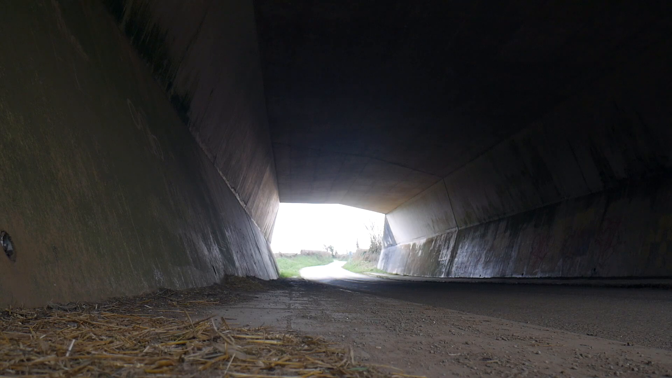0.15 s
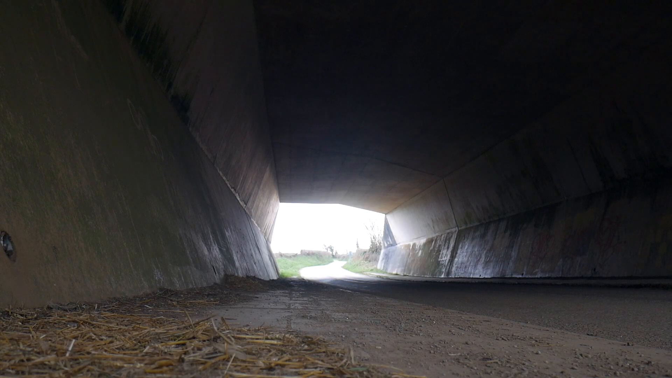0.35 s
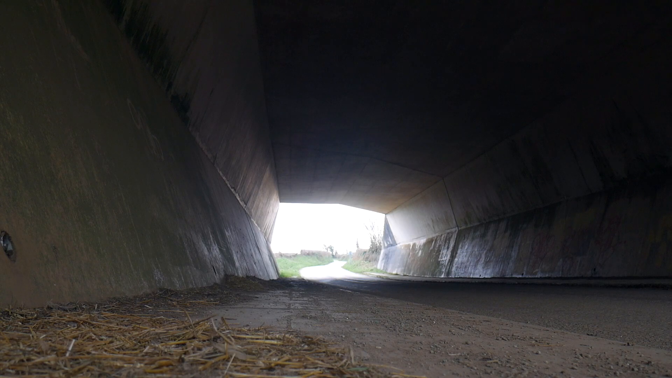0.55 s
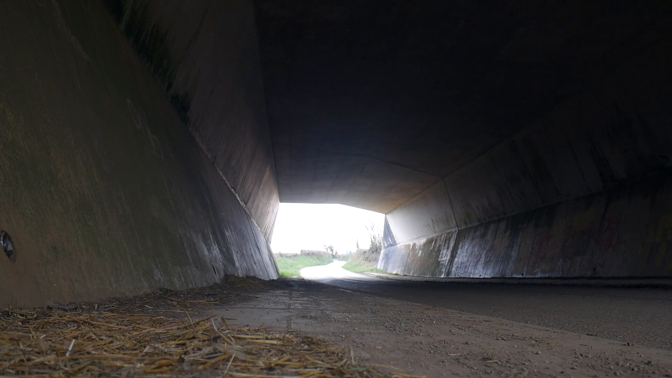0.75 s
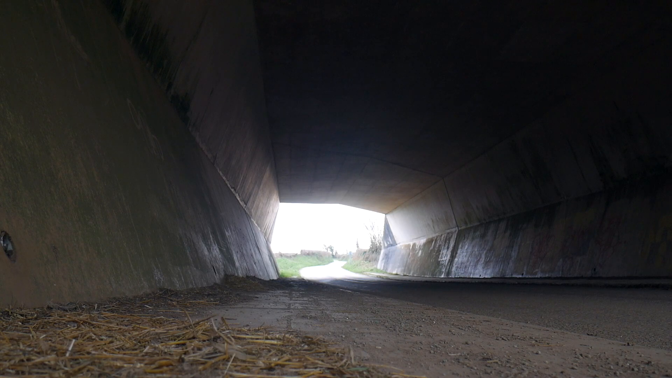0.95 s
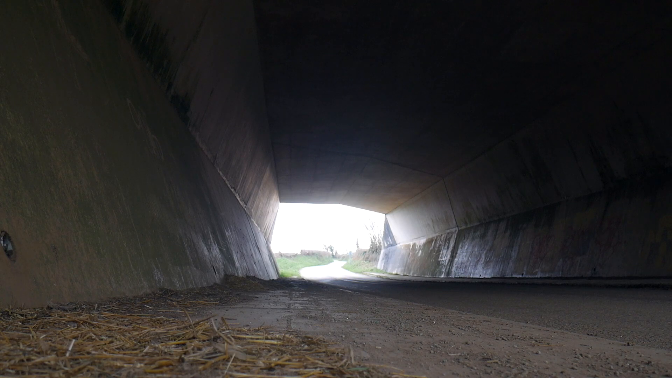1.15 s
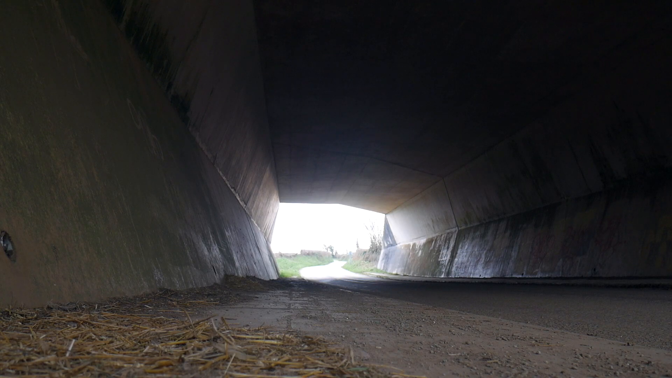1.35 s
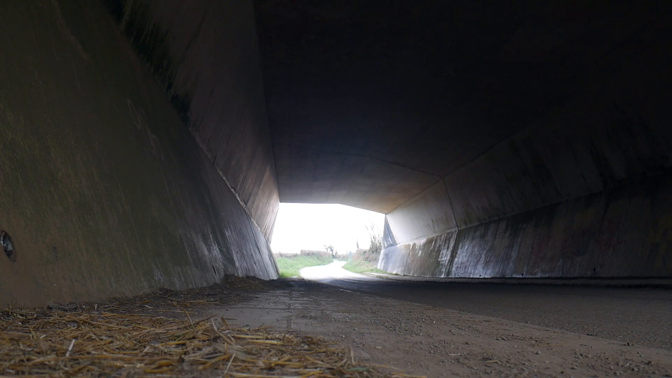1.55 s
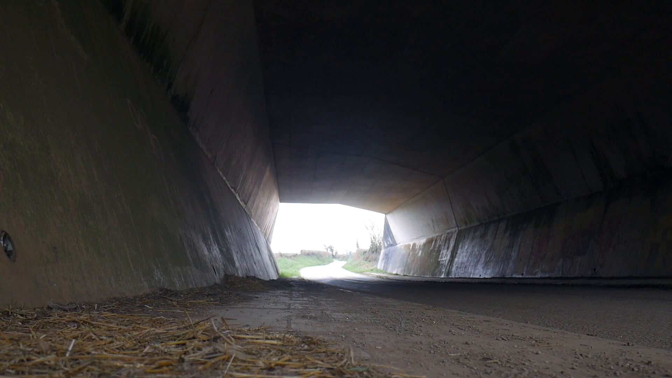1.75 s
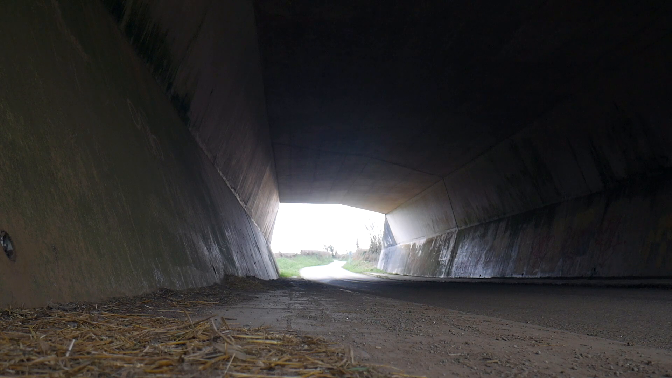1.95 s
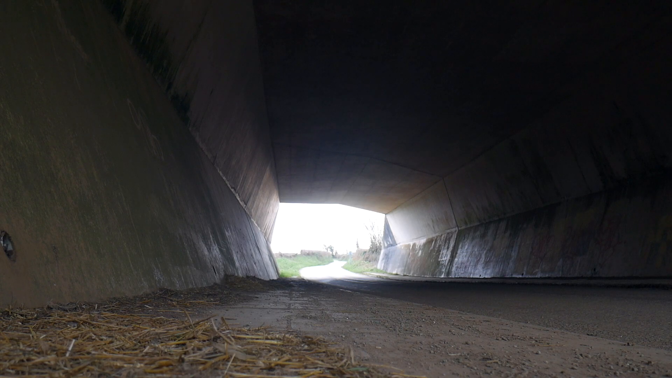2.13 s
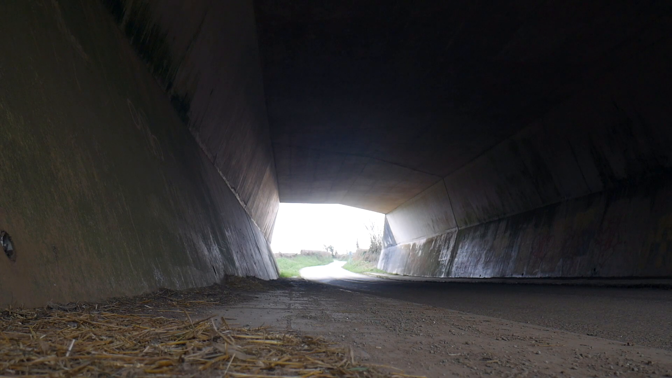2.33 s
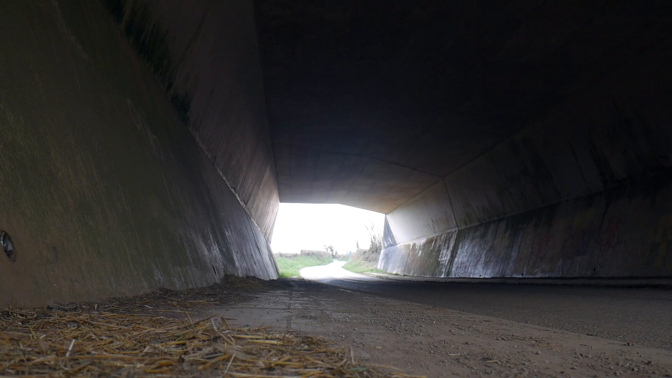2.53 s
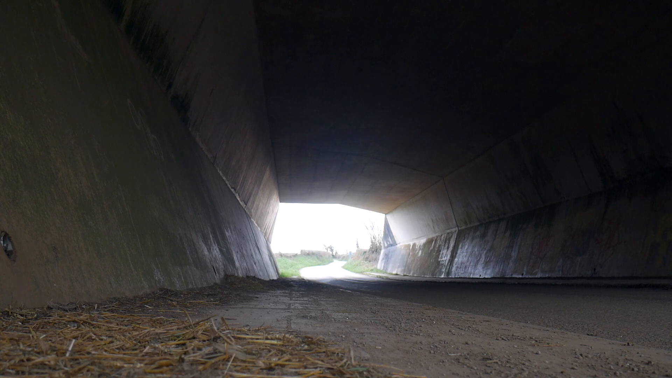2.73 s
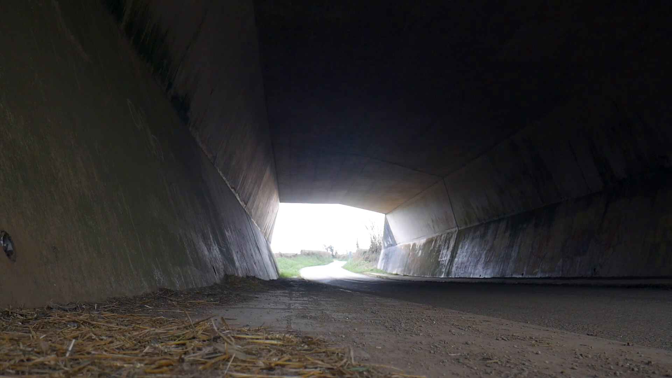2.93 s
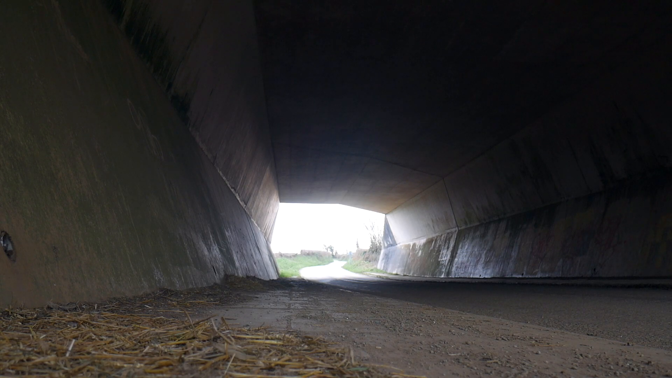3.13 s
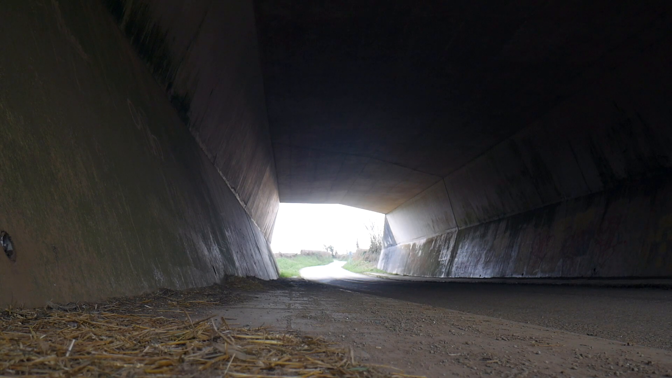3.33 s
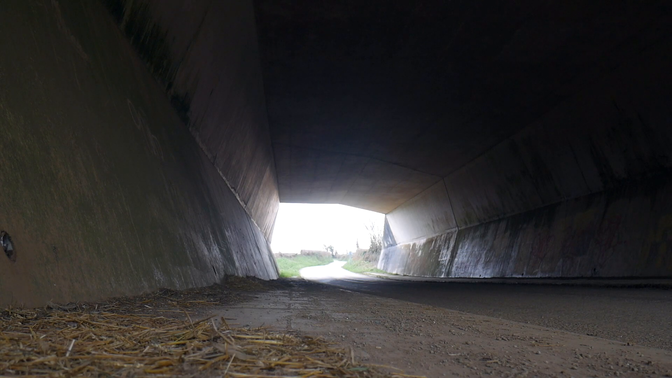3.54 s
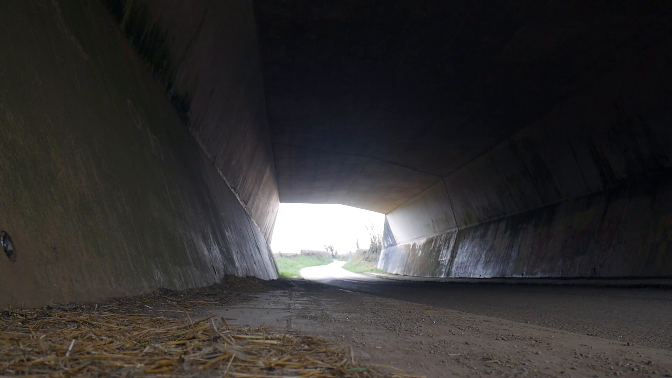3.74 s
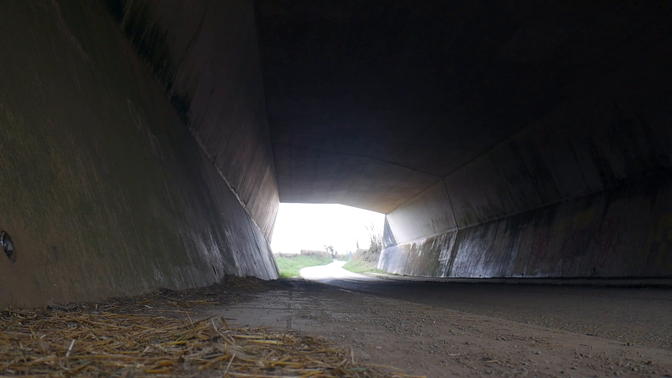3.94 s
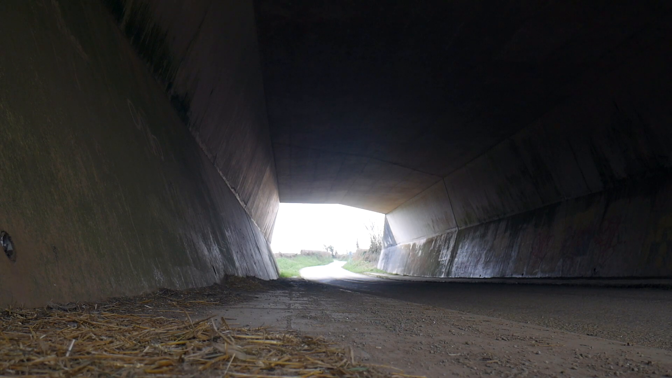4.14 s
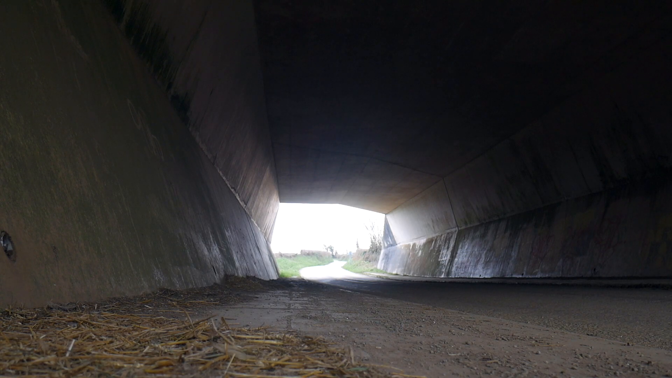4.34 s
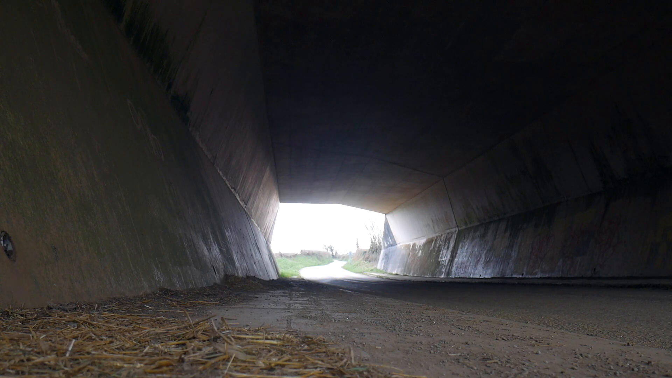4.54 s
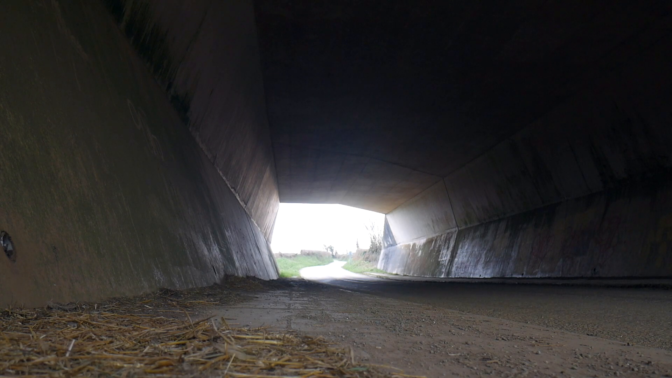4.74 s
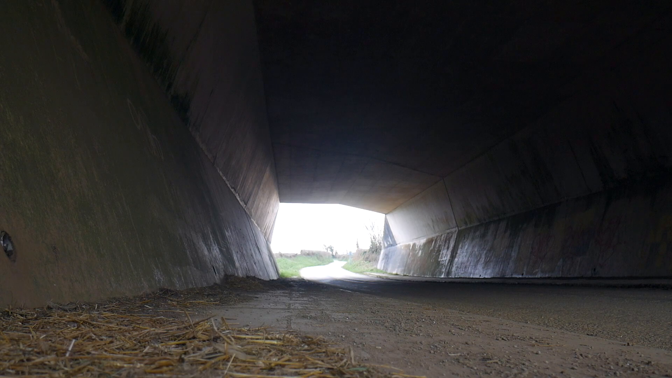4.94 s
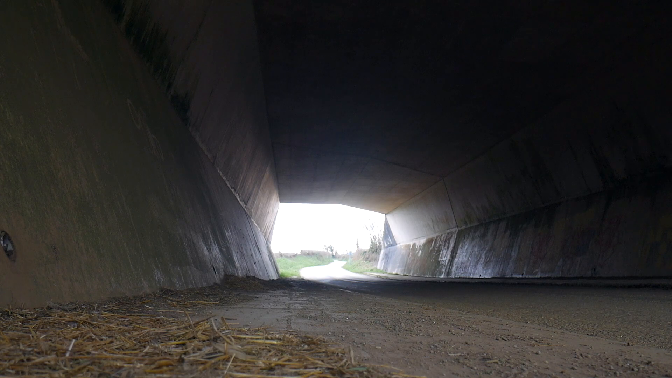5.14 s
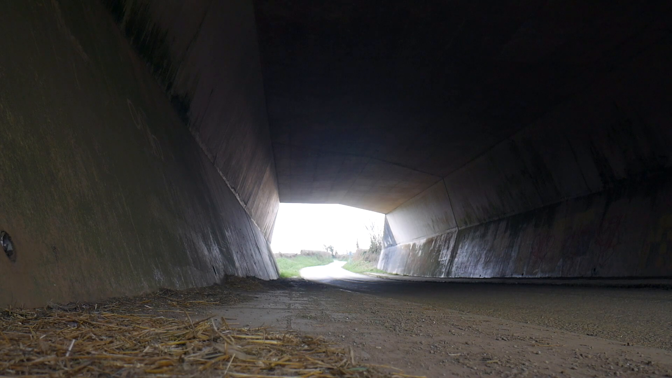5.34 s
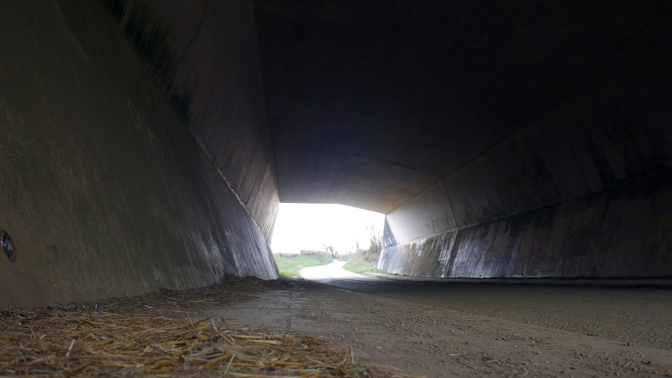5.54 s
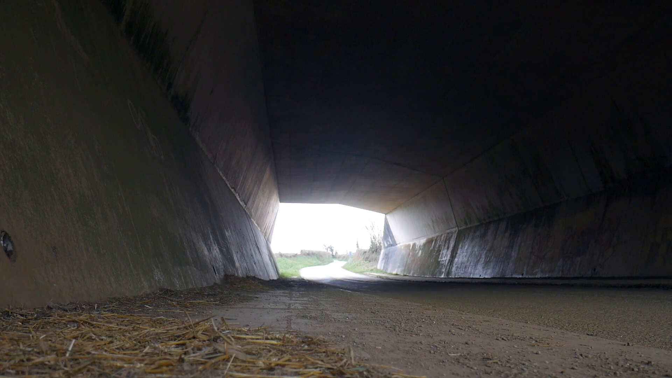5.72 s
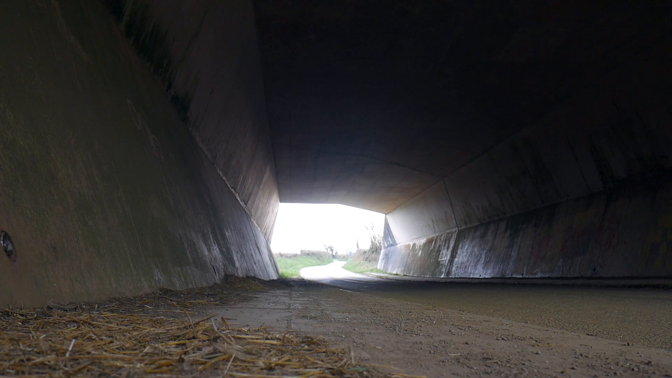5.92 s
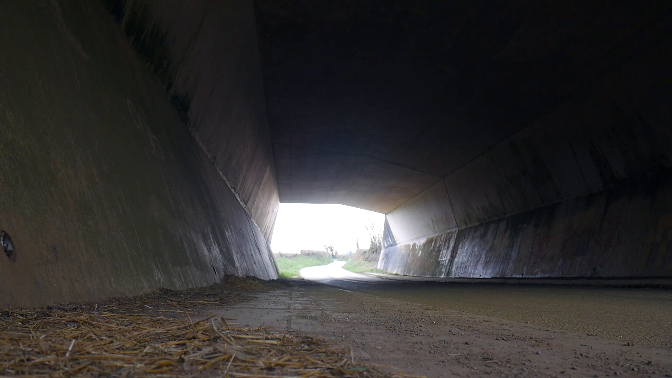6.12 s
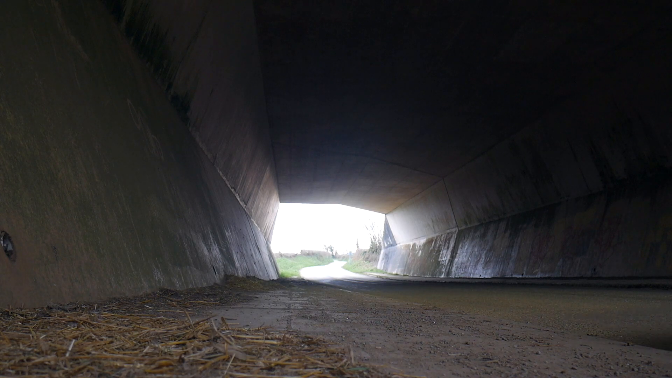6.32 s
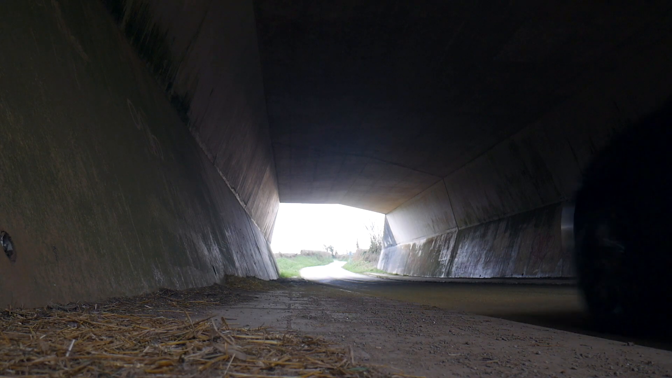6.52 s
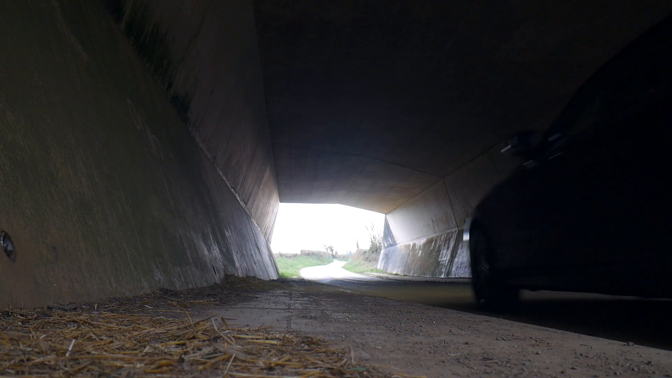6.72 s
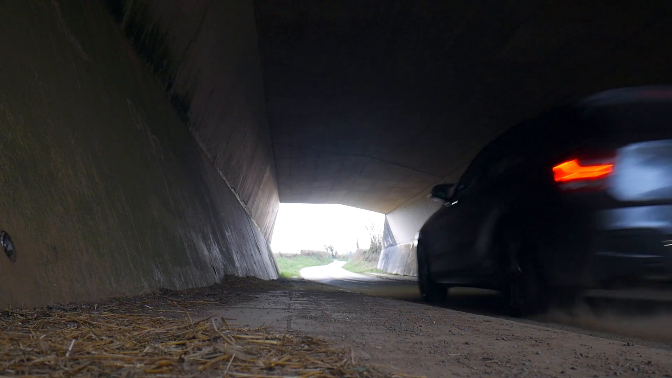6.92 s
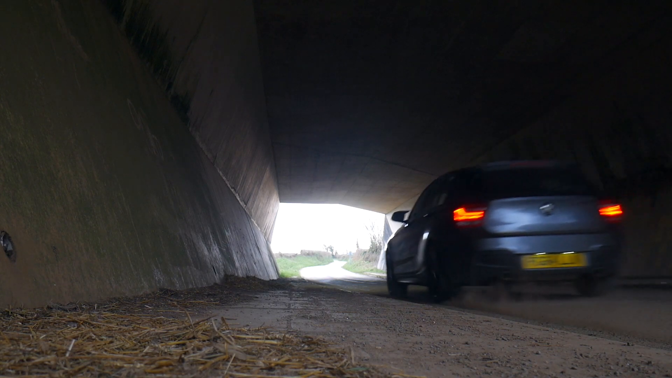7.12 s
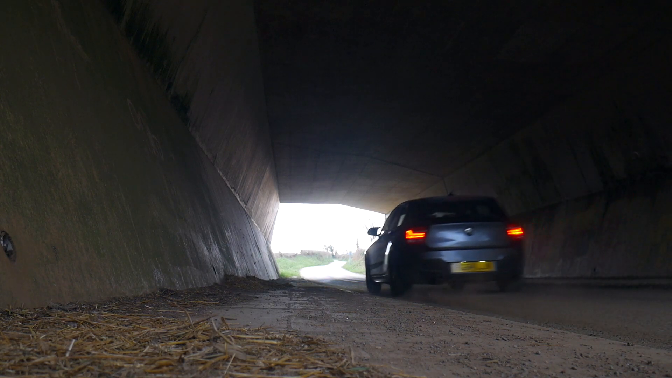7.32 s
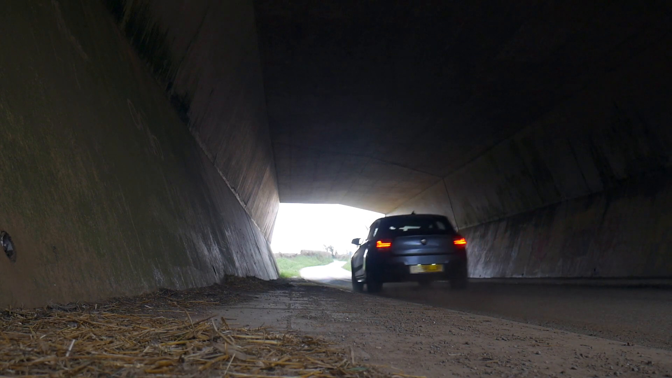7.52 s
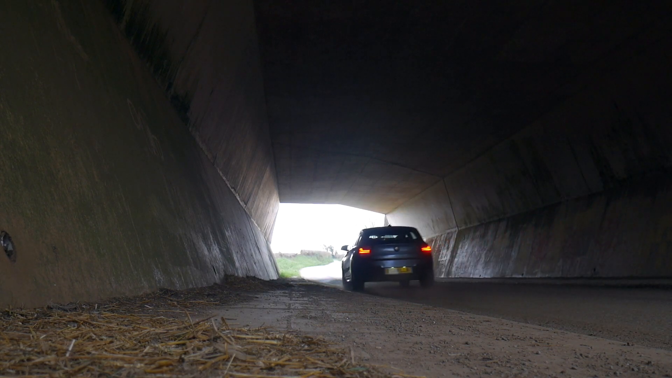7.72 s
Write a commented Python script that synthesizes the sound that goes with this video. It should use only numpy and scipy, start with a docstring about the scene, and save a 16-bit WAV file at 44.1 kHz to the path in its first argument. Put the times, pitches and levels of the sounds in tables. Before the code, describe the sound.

A dull far traffic rumble fills a tunnel for two seconds before a deep engine blip rises and sinks. The car launches, tyres chattering in brief squeaks, and its low throb grows into a rising growl and a wide rush of exhaust, road and tyre noise. It passes very near, revs high, then crackles and thumps as the pitch starts falling. Sparse concrete echoes, centred low microphone, clean close sound.

```python
"""Distant traffic washes through a concrete underpass, a smooth band of noise with low hums, while a
six-cylinder turbo car idles behind the listener: tones locked to its firing rate. It blips, pulls away with
the tyres chirping (grains of rubber modes), passes close in a noise roar with a thin whistle, and pops at
the gear change. The walls answer with sparse echoes. The microphone pair sits on the ground, nearly mono."""
import sys
import numpy as np
from scipy import signal
from scipy.fft import irfft
from scipy.io import wavfile
from scipy.ndimage import uniform_filter1d

SR = 44100
rng = np.random.default_rng(int(sys.argv[2]) if len(sys.argv) > 2 else 0)


def generate_wav(signal):
    """Clip the signal to [-1, 1] and save it as 16-bit WAV at the path in sys.argv[1]."""
    frames = np.transpose(np.atleast_2d(signal))
    scaled = np.clip(frames, -1, 1) * 32767
    pcm = np.round(scaled).astype(np.int16)
    wavfile.write(sys.argv[1], SR, pcm)


def amplitude_ratio(level_db):
    """Convert a level in decibels to the matching linear amplitude (field) ratio."""
    exponent = np.asarray(level_db, float) / 20
    return 10 ** exponent


N = 347067
T = np.arange(N) / SR

# the engine's course: time_s, firing_rate_hz, firing_tone_db
ENGINE_COURSE = [(0, 37, -48.5), (2.05, 36.5, -44.5), (2.28, 35.9, -40.5), (2.54, 52.9, -22.5),
                 (2.76, 58.25, -24), (3.0, 51.7, -26.5), (3.22, 32, -36.5), (3.38, 27, -32),
                 (3.55, 33.45, -30), (3.83, 54.6, -20), (4.03, 52.36, -20.5), (4.16, 58.2, -18),
                 (4.27, 67, -25.5), (4.4, 76.7, -15), (4.6, 90.6, -16.5), (4.8, 86, -16.5), (4.97, 87, -12),
                 (5.12, 94.9, -20.5), (5.54, 112.6, -11.5), (5.68, 116.6, -25), (5.98, 134.2, -13),
                 (6.09, 139.4, -16), (6.4, 161.1, -15), (6.5, 180.8, -20), (6.6, 195.5, -14),
                 (7.06, 272.4, -16), (7.3, 291, -21), (7.6, 281.4, -28), (7.8, 238, -25),
                 (7.87, 227.4, -24)]
# spells of wheelspin: start_s, end_s, slip_db, breathy_band_db
WHEELSPINS = [(3.675, 3.78, -23, -57), (3.85, 4.01, -27.5, -60), (4.1, 4.15, -29, -60),
              (4.548, 4.72, -21, -48), (4.74, 4.81, -23, -47)]


def exhaust():
    """Tones in step on the firing rate, so each firing is a throb; also gives the running count of firings."""
    # second and third multiples against the firing tone: firing_rate_hz, second_db, third_db
    overtones = [(27, 7.5, -1), (33, 0.5, 4), (37, 7.5, 2), (43, 0, -5.5), (51.6, -2.5, -19),
                 (58.8, -6, -20), (68, -20, -20), (78, -13.5, -36), (86.7, -13.5, -24.5), (100.1, -18, -10),
                 (110.2, -20, -34), (119.8, -19, -11), (140.1, -10, -23), (150.5, -15, -11.5),
                 (182, -8, -21), (201.3, -11.5, -17), (244, -15, -12), (276.1, -8.5, -33), (291, -12, -27)]
    # tones at sixths of the firing rate (unequal cylinders), and its fourth and fifth multiples:
    # multiple_of_firing_rate, relative_db
    uneven = [(2 / 6, -8.5), (4 / 6, -4), (5 / 6, -5.5), (8 / 6, -4.5), (9 / 6, -2.5), (10 / 6, 1),
              (14 / 6, -2), (15 / 6, -2.5), (16 / 6, -0.48), (20 / 6, -3), (22 / 6, -11.5), (4, -10),
              (26 / 6, -7.5), (5, -6)]
    # level of those tones: time_s, level_db
    lumpy = [(2, -53), (2.4, -44), (3, -43), (3.5, -34), (4, -38), (4.8, -39), (5.5, -31), (6.15, -23.5),
             (7, -28), (7.87, -31)]
    # where the tone at half the firing rate swells: start_s, end_s, level_db
    half_swells = [(3.799, 5.4, -40), (5.622, 6.1, -26.5), (7.352, 7.65, -32.5)]
    cut_from_s, cut_to_s, cut_db = 7.43, 7.77, -8  # the firing tone sinks while the spark is cut
    pipe_hz, pipe_width_hz, pipe_db = 835, 104, 8.5  # tailpipe resonance, lifts uneven tones passing through

    hz, tone_db = curves(ENGINE_COURSE)
    second_db, third_db = curves(overtones, hz)
    lumpy_db = curves(lumpy)[0]
    firings = np.cumsum(hz) / SR
    half = amplitude_ratio(-44) + sum(amplitude_ratio(db) * spell(start, end, 0.073) for start, end, db in half_swells)
    tones = [(1, amplitude_ratio(tone_db + cut_db * spell(cut_from_s, cut_to_s, 0.014))),
             (0.5, half),
             (2, amplitude_ratio(tone_db + second_db + 1.25 * drift(9))),
             (3, amplitude_ratio(tone_db + third_db + 0.96 * drift(8.2)))]
    out = np.zeros(N)
    for multiple, size in tones:
        # reflections break up the high tones of a moving car
        shake = np.clip(0.0035 * (multiple - 1) * (hz - 30), 0, 1.3)
        strength = (1 + shake * drift(25)) / np.sqrt(1 + shake ** 2 / 2)
        phase = 2 * np.pi * multiple * firings + shake * drift(26)
        out += np.sqrt(2) * size * strength * np.sin(phase)
    for multiple, db in uneven:
        lift_db = pipe_db / (1 + ((multiple * hz - pipe_hz) / pipe_width_hz) ** 4)
        tone = np.cos(2 * np.pi * (multiple * firings + rng.random()) + 1.1 * drift(22))
        out += amplitude_ratio(lumpy_db + db + lift_db) * (0.67 + 0.61 * drift(18)) * tone
    return out, firings


def rush(firings):
    """Turbulent exhaust and road roar puffing with each firing, a gusty hiss of tyres on grit and intake air."""
    # level of roar and hiss as heard, with a sudden dip after 6.36 s: time_s, roar_db, hiss_db
    heard_level = [(2.1, -48, -50.5), (3.4, -45, -57.5), (3.7, -38.5, -50.5), (4.1, -38, -53.5),
                   (4.6, -31.5, -45), (5, -29, -43.5), (5.65, -25, -38.5), (5.87, -20, -34),
                   (6, -21.5, -34), (6.07, -17.5, -31.5), (6.36, -16.5, -28.5), (6.385, -22, -36.5),
                   (6.5, -17.5, -32.5), (6.95, -18.5, -34), (7.4, -16.5, -33.5), (7.74, -16.5, -42),
                   (7.78, -20.5, -44), (7.81, -17.5, -36), (7.87, -18.5, -41)]
    # colour of the roar: frequency_hz, density_db (per Hz)
    roar_colour = [(35, -45), (60, -12), (91, -21), (142, -11), (259, -5.5), (376, -8), (829, -1),
                   (1070, -7), (1670, -9.5), (1910, -14.5), (6710, -33.5), (12900, -46), (15500, -74)]
    # colour of the hiss: frequency_hz, density_db (per Hz)
    hiss_colour = [(880, -20), (1500, -10), (2090, -1.5), (2420, -7.5), (2750, -5), (3410, -11.5),
                   (6750, -9), (8290, -15), (12700, -22), (15500, -27.5)]
    # lift of the roar's upper part: time_s, lift_db
    brightness = [(2.8, 8), (4.3, 0), (4.9, 1), (5.9, -1.5), (6.7, -1.5), (7.3, 3.5)]

    def bright_db(hz, t):
        return curves(brightness, t)[0] * np.exp(-np.log((hz + 1) / 1800) ** 2 / 0.24)

    roar_db, hiss_db = curves(heard_level)
    start = np.clip((T - heard_level[0][0]) / 0.7, 0, 1)
    puff = 1 + 0.13 * np.cos(2 * np.pi * firings)
    roar = noise(roar_colour, 1.37, bright_db) * puff * amplitude_ratio(roar_db + drift(40))
    hiss = noise(hiss_colour, patchy_db=1.4) * amplitude_ratio(hiss_db + 0.54 * drift(60))
    # a rasp once the tailpipes face the listener
    rasp = band_noise(1500, 1720) * amplitude_ratio(-33 + 2.7 * drift(12)) * spell(6.85, 7.8, 0.1)
    return (roar + hiss) * start + rasp


def tyres():
    """Each slip is a rounded grain of the tread modes with a scrape; flicked grit makes short bright ticks."""
    # single slips, faint to loud: time_s, strength_db, pitch_hz
    chirps = [(3.127, -28, 1042), (3.567, -28, 1082), (3.665, -31, 909), (3.701, -20, 966),
              (3.745, -20, 1000), (3.939, -16.5, 936), (3.95, -19.5, 944), (3.981, -23, 1010),
              (4.301, -18.5, 847), (4.51, -20.5, 1098), (4.54, -10.5, 992), (4.553, -13, 817),
              (4.631, -13, 895), (4.765, -17, 1014), (4.778, -14.5, 795), (5.04, -15.5, 788)]
    # modes of the rubber: multiple_of_pitch, relative_db
    tread = [(1, 3.5), (1.55, -8.5), (2.1, -15)]
    # grit flicked up by the tyres: time_s, strength_db, pitch_hz
    grit = [(6.37, -30, 3130), (6.4988, -34, 3200), (6.5788, -21, 6830), (6.6194, -23, 6332),
            (6.7296, -22, 3894), (6.795, -18, 4337), (7.7824, -26, 3180)]

    t = np.arange(3000) / SR
    spinning = sum(amplitude_ratio(db) * spell(start, end + 0.026, 0.018) for start, end, _, db in WHEELSPINS)
    out = band_noise(2790, 3030) * amplitude_ratio(3 * drift(50)) * spinning  # breathy band
    swell = 1 - np.exp(-(t / 0.0015) ** 2)
    scrapes = amplitude_ratio(-18) * band_noise(880, 3300)
    for s, db, hz in chirps + patter():
        ring = sum(amplitude_ratio(mode_db) * np.sin(2 * np.pi * k * hz * t) for k, mode_db in tread)
        ring += scrapes[round(s * SR):][:len(t)]
        add(out, s, amplitude_ratio(db - 60 * t / 0.028) * swell * ring)
    snaps = band_noise(2200, 9000)
    for s, db, hz in grit:
        tick = np.sin(2 * np.pi * hz * t) + 0.9 * snaps[round(s * SR):][:len(t)]
        add(out, s, amplitude_ratio(db - 60 * t / 0.014) * (1 - np.exp(-t / 0.00067)) * tick)
    return out


def patter():
    """Rows (time_s, strength_db, pitch_hz) of the slips that patter through every spell of wheelspin."""
    gap_s, low_hz, high_hz = 0.012, 843, 1114
    s = np.arange(WHEELSPINS[0][0], WHEELSPINS[-1][1], gap_s)
    late, pitch = rng.random((2, len(s)))
    s = s + late * gap_s
    hz = low_hz + pitch * (high_hz - low_hz)
    return [(s[i], db, hz[i])
            for start, end, db, _ in WHEELSPINS
            for i in np.flatnonzero((s > start) & (s < end))]


def pops():
    """Firing in bursts while the spark is cut: a suck and ring of the pipe, a low thump, and a burble."""
    # pops at the gear change: time_s, strength_db, ring_t60_s
    bursts = [(7.455, -8.5, 0.2), (7.524, -8, 0.099), (7.584, -11, .1), (7.61, -8, 0.14),
              (7.675, -6.5, 0.043), (7.728, -2, 0.03), (7.765, 2.5, 0.024)]
    # low burble of uneven burning: start_s, end_s, level_db
    burbles = [(7.352, 7.65, -28.5), (7.761, 7.87, -33)]

    out, t = np.zeros(N), np.arange(9000) / SR
    for s, db, t60 in bursts:
        firing_hz = curves(ENGINE_COURSE, s + 0.02)[0]
        ring = amplitude_ratio(-60 * t / t60) * np.sin(2 * np.pi * firing_hz * t)
        thump = amplitude_ratio(-20 - 60 * t / 0.073) * np.sin(2 * np.pi * 95 * t)
        # the minus sign makes the first swing a suck
        add(out, s, -amplitude_ratio(db) * (1 - np.exp(-t / 0.00097)) * (ring + thump))
    burning = sum(amplitude_ratio(db) * spell(start, end, 0.015) for start, end, db in burbles)
    return out + band_noise(45, 209, order=3) * burning


def turbo():
    """A thin whistle while boost builds: a gliding sine wavering in pitch and level."""
    # whistles: start_s, end_s, from_hz, to_hz, level_db
    whistles = [(5.282, 5.555, 3720, 3810, -53), (5.549, 5.87, 3820, 3900, -49),
                (5.868, 6.034, 4000, 4370, -47), (7.0, 7.22, 3250, 3420, -44)]
    out = np.zeros(N)
    for start, end, from_hz, to_hz, db in whistles:
        hz = np.interp(T, [start, end], [from_hz, to_hz]) + 55 * drift(90)
        tone = np.sqrt(2) * np.sin(2 * np.pi * np.cumsum(hz) / SR)
        out += spell(start, end, 0.026) * amplitude_ratio(db + 3 * drift(30)) * tone
    return out


def traffic():
    """A smooth far wash of noise that sinks away, with a low drone and wavering hums of far engines."""
    # loudness of the traffic: time_s, wash_db, drone_db (low part relative to the wash)
    loudness = [(0, -31, -4), (.6, -30, -1), (1.8, -29.5, -1.5), (3, -32, -7), (4.2, -36.5, -4),
                (7.87, -51, 4)]
    # colour of the wash: frequency_hz, density_db (per Hz)
    wash_colour = [(12, -33), (20, -9.5), (85, -1), (166, -4), (245, 0.5), (289, -6), (362, -11),
                   (788, -12.5), (932, -10), (1720, -23.5), (2400, -32.5), (2680, -31.5), (5690, -45),
                   (7950, -45), (15500, -63)]
    # far engines, before they follow the drone: pitch_hz, strength_db
    far_engines = [(232, -50), (288, -51)]

    def low_db(hz, t):
        return curves(loudness, t)[1] / (1 + (hz / 550) ** 4)

    wash_db, drone_db = curves(loudness)
    hums = np.zeros(N)
    for hz, db in far_engines:
        size = amplitude_ratio(db + 2.7 * drift(5.1))
        hums += size * np.sin(2 * np.pi * np.cumsum(hz + 3 * drift(4)) / SR)
    wash = noise(wash_colour, 0.96, low_db) * amplitude_ratio(wash_db + 0.17 * drift(8.07))
    return wash + hums * amplitude_ratio(2.7 * drone_db)


def tunnel(x):
    """Echo of the walls: sparse taps of random sign, each band dying at its own speed."""
    # reverberation of the underpass: frequency_hz, t60_s
    decay = [(60, 4.1), (250, 1.15), (1000, 0.53), (4000, 1.2), (12000, 0.072)]
    at = np.arange(500, 2 * SR - 20, 20)
    reflections = np.zeros(2 * SR)
    reflections[at + rng.integers(0, 20, len(at))] = rng.choice([-1., 1.], len(at))
    hz, t, z = signal.stft(reflections, SR, nperseg=256)
    dying = amplitude_ratio(-60 * t / read(decay, hz)[:, None])
    tail = signal.istft(z * dying, SR, nperseg=256)[1]
    return signal.fftconvolve(x, tail / np.linalg.norm(tail))[:N]


def evened(x):
    """Scales to rms 1."""
    return x / np.sqrt(np.mean(x ** 2) + 1e-20)


def read(points, hz):
    """A spectrum table read on a log frequency axis."""
    f, value = np.transpose(points)
    return np.interp(np.log(hz + 1), np.log(f + 1), value)


def curves(rows, t=T):
    """The columns of a table at the times (or other first-column values) t."""
    s, *columns = np.transpose(rows)
    return [np.interp(t, s, c) for c in columns]


def add(mix, s, sound):
    """Mixes a sound in at s seconds."""
    part = mix[round(s * SR):][:len(sound)]
    part += sound[:len(part)]


def drift(per_s):
    """Slow random curve: straight lines between normal draws, per_s of them a second."""
    knots = np.arange(0, T[-1] + 1, 1 / per_s)
    return np.interp(T, knots, rng.standard_normal(len(knots)))


def spell(start, end, edge_s):
    """Rises, holds at 1 and falls between two times."""
    return np.clip(np.minimum(T - start, end - T) / edge_s, 0, 1)


def noise(spectrum, patchy_db, shape_db=lambda hz, t: 0):
    """Noise of rms 1 from random short-time spectra with drifting patches."""
    count, hz = N // 256 + 5, np.fft.rfftfreq(1024, 1 / SR)[:, None]
    a, b, patches = rng.standard_normal((count, 513, 3)).T
    patches = uniform_filter1d(patches, size=10, axis=0)
    patches = evened(uniform_filter1d(patches, size=10, axis=1))
    level_db = read(spectrum, hz) + patchy_db * patches + shape_db(hz, np.arange(count) * 256 / SR)
    return evened(signal.istft((a + 1j * b) * amplitude_ratio(level_db), nperseg=1024, noverlap=768)[1][:N])


def band_noise(low_hz, high_hz, order=2):
    """Noise of rms 1 between two band edges."""
    sos = signal.butter(order, (low_hz, high_hz), "bandpass", fs=SR, output="sos")
    return evened(signal.sosfilt(sos, rng.standard_normal(N)))


def scene():
    """The car's tones and hits with their echo, over the noises; one signal reaches both microphones."""
    tones, firings = exhaust()
    hits = tyres() + pops() + turbo()
    echo = tunnel(amplitude_ratio(-19) * tones + amplitude_ratio(-8.5) * hits)
    return np.tile(tones + hits + echo + rush(firings) + traffic(), (2, 1))


def low_pass(x):
    """Removes everything above the highest recorded frequency."""
    return signal.sosfilt(signal.butter(12, 15650, fs=SR, output="sos"), x)


def record(dry):
    """Soft overload, a faint scrambled side copy of the sound, and each channel's own hiss."""
    # level of the side copy against the sound: frequency_hz, relative_db
    side_copy = [(100, -51.5), (800, -41.5), (3000, -26), (12000, -16.5)]
    # colour of each channel's hiss: frequency_hz, density_db (per Hz)
    self_hiss = [(100, -30), (3500, -9), (5000, -2), (9000, 0), (15000, -2)]
    mid = 1.638 * np.tanh(dry[0] / 1.572)
    hz = np.fft.rfftfreq(2048, 1 / SR)
    random_phase = np.exp(2j * np.pi * rng.random(len(hz)))
    side = signal.oaconvolve(mid, irfft(amplitude_ratio(read(side_copy, hz)) * random_phase), "same")
    own = np.array([noise(self_hiss, patchy_db=3.5) for _ in dry]) * amplitude_ratio(-62.5)
    return low_pass(np.array([mid + side, mid - side]) + own)


dry = scene()
out = record(dry)
generate_wav(out)
```